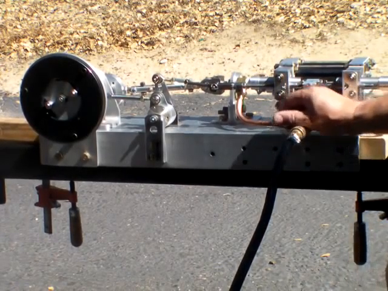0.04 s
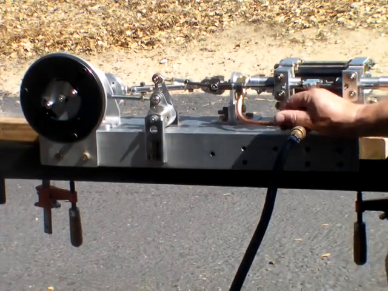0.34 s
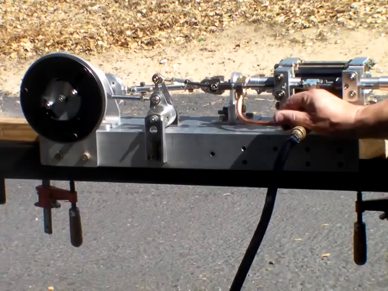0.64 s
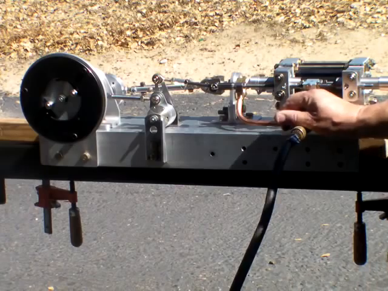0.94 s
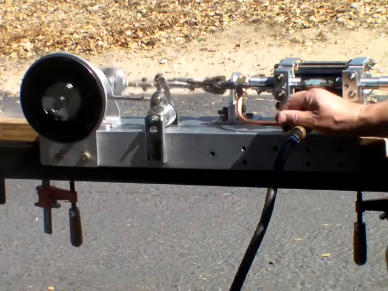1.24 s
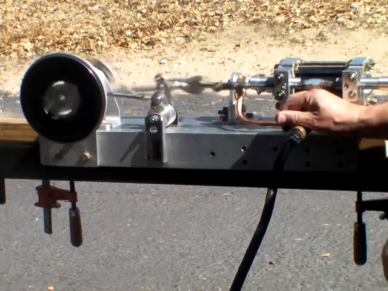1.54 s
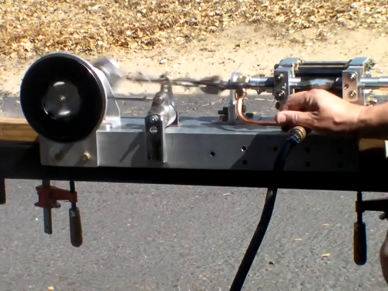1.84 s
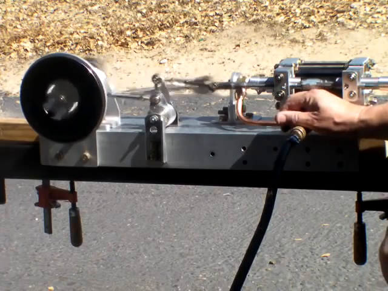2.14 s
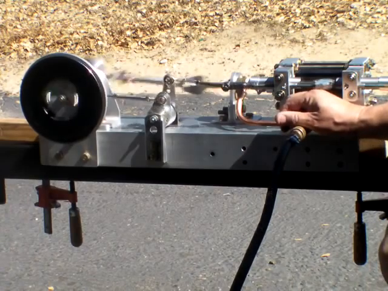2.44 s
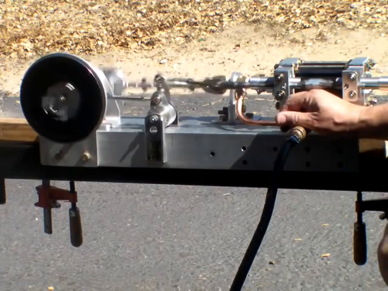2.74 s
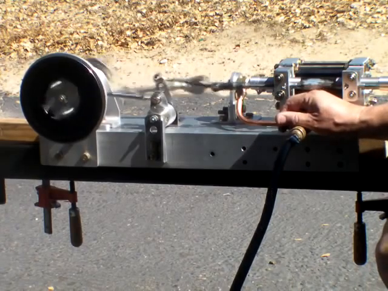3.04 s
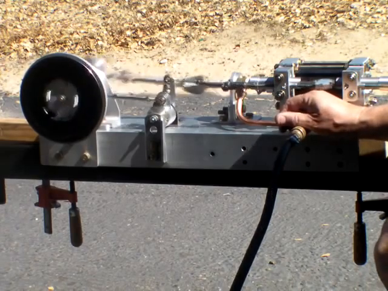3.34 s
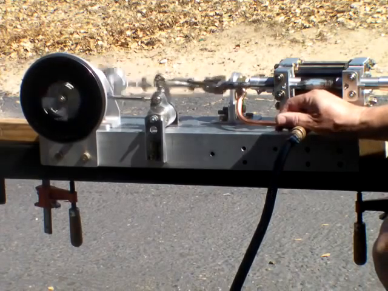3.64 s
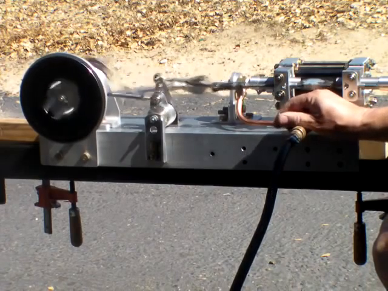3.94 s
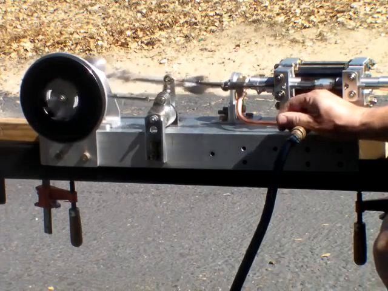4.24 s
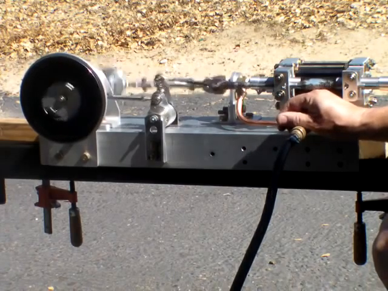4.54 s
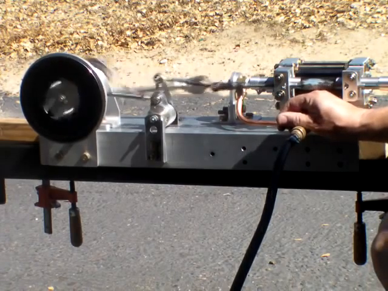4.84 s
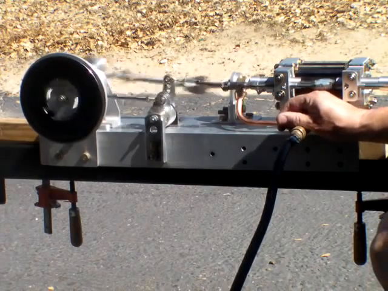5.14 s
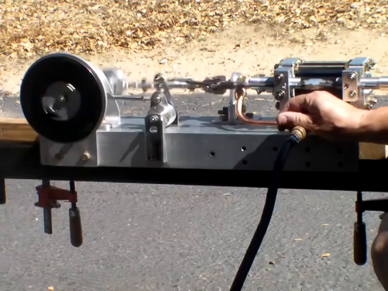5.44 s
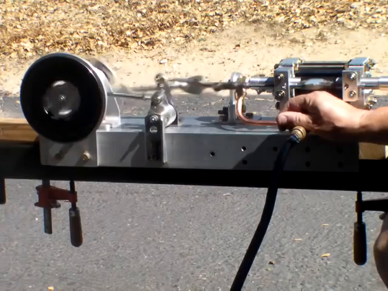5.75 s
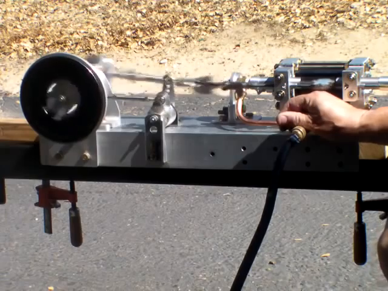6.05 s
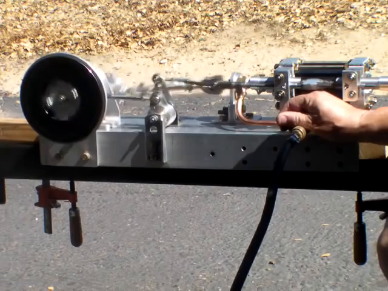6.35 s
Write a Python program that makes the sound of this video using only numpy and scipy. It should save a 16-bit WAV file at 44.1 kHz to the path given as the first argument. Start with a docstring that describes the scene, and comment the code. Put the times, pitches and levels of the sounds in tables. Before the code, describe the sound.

For the first second it is quiet outdoors: only a faint, thin leak from a shut valve, soft open air and a barely audible electric hum far off. At about 1 second the valve opens with a short, singing hiss, and at about 1.2 seconds a small steam engine kicks over close to the microphone. After one softer, slower turn it races briefly, then eases slightly, settling by about 2.5 seconds at nearly eight turns a second. Each turn brings the same loud round of knocks: the loose metal linkage chatters and clinks, the engine bed clanks, and the metal trailer underneath adds a hollow boom. Sharp, hissing exhaust puffs and a faint breathy whistle pulse in time with the clatter over a steady rush from the supply. The engine keeps this fast, even rhythm until the end, at about 6.5 seconds.

```python
"""Small steam engine on a trailer

Outdoors, close up, in stereo. A home-built engine clamped to a metal trailer waits with a faint leak.
Its valve is opened: it hisses, kicks over, races briefly and settles at nearly eight turns a second.
Every turn brings the same round of knocks: the loose linkage chatters, the trailer booms, and each end
of the cylinder puffs out its exhaust. Behind it lie quiet open air and a far electric hum."""
import sys
import numpy as np
from scipy import signal
from scipy.fft import rfft, irfft, next_fast_len
from scipy.io import wavfile
from scipy.ndimage import uniform_filter1d

SR = 44100
rng = np.random.default_rng(int(sys.argv[2]) if len(sys.argv) > 2 else 0)


def persist_wave(psi):
    """Save psi, clipped to +-1, as 16-bit WAV."""
    counts = np.round(np.clip(psi, -1, 1) * 32767).astype(np.int16)
    wavfile.write(sys.argv[1], SR, np.atleast_2d(counts).T)


N = 286650

# crank speed from the first kick on: t/s, speed/(turns a second)
CRANK_SPEED = [(1.154, 5.6), (1.29, 5.4), (1.354, 8.34), (1.6, 8.33), (1.95, 8.04), (2.5, 7.86),
               (3.35, 7.71), (3.8, 7.815), (4.5, 7.76), (5.3, 7.805), (5.75, 7.88), (6.5, 7.89)]
# one round of knocks: start/turns, half length/turns, then level/dB in trailer, engine bed and rods
KNOCKS = [(.015, .075, -2.5, -7, -2), (.11, .05, -7.5, -6.5, 1), (.15, .05, -5, -6, -6),
          (.2, .05, -1.5, -7, -1.5), (.265, .05, -4, -7, -4.5), (.33, .05, 0.5, -8, -9.5),
          (.39, .04, 1.5, -10.5, -16), (.48, .03, 0, -17.5, -21), (.53, .04, 0, -15.5, -8),
          (.58, .04, 1.5, -12, -8), (.65, .06, -3, -10.5, -10.5), (.73, .06, -3, -13, -11.5),
          (.82, .08, -3.5, -11.5, -13), (.92, .08, -1, -20, -24)]
# resonances of the struck parts: f/Hz, width/Hz, level/dB against the part's broad colour
TRAILER_MODES = [(133, 11, 9), (181.4, 13.6, 13), (225.7, 10, 9.5), (335.3, 8.95, 5.5), (371, 37, 5),
                 (435, 14, 1), (454, 17, 2), (680, 25, 7.5), (865, 25, 12.5)]
BED_MODES = [(1209, 44, 11.3), (1320, 21.2, 7.7), (1698, 16, 6.8), (1888, 28, 9), (2083, 37, 9.1),
             (2182, 38, 7.2), (2356, 36, 6.6), (2786, 23, 7.6), (3360, 65, 7.6), (3560, 27, 2.5)]
ROD_MODES = [(3760, 28, 10), (4080, 66, 4.4), (4520, 140, 5), (4673, 100, 8.9), (4670, 70, 5.8),
             (5430, 97, 8), (5550, 54, 9.6), (5660, 29, 4.1)]
# broad colours of the same parts: f/Hz, level/dB
TRAILER_COLOUR = [(22, -56), (48, -24), (90, -6.5), (140, -6.5), (280, -6.5), (360, 1), (600, 4), (800, -9),
                  (1100, -1.5), (2000, -26), (6000, -78)]
BED_COLOUR = [(200, -53), (700, -14.5), (1050, -1), (1500, -5.5), (2400, -1.5), (3300, -0.5), (4500, -2),
              (8000, -8), (16000, -35)]
ROD_COLOUR = [(600, -14.5), (2200, -38), (3400, -7), (4400, 0), (5900, -0.5), (6900, -11), (8000, -13.5),
              (10200, -5), (12500, -10), (16000, -13)]
# trailer boom and crosshead clink as the piston turns back: f/Hz, width/Hz, level/dB
BOOM_MODES = [(96, 57, -2), (137.3, 16.6, 2), (191.5, 31, -5), (227, 28, -9)]
CLINK_MODES = [(4250, 120, 1), (4700, 130, 3)]
# engine bed clank and trailer thud on the power stroke: f/Hz, width/Hz, level/dB
CLANK_MODES = [(1207, 36, -1), (1330, 50, -9)]
THUD_MODES = [(347, 32, 0), (696, 40, -1)]
# exhaust puffs at each end of the cylinder: angle/turns, half width/turns, level/dB
FRONT_PUFFS = [(.12, 0.05, -23), (.22, .11, -29), (.338, 0.03, -16.5), (.38, 0.056, -32)]
REAR_PUFFS = [(.83, 0.038, -18)]
# colours of the two exhausts and the supply's rush: f/Hz, level/dB
FRONT_COLOUR = [(300, -31), (1500, -1), (3500, -3), (6000, 1), (7200, -2), (8800, 2.5), (10800, 3),
                (13000, -2), (16000, -5)]
REAR_COLOUR = [(300, -35), (2000, -23), (3300, 0), (4500, -1.5), (7500, -6), (8800, 1), (10200, 2),
               (12200, 5.5), (14000, 0), (16000, -0.5)]
FLOW_COLOUR = [(60, -18), (500, -5.5), (2000, 1.5), (3500, 1.5), (4300, -1), (5500, 1.5), (7200, -5),
               (11500, -4), (16000, -4.5)]
# air whistling through the slide valve: angle/turns, f/Hz, level/dB
INLET_GLIDE = [(.58, 4440, -48), (.66, 4930, -36), (.75, 5390, -26), (.81, 5656, -30.5), (.87, 6700, -39),
               (.93, 7180, -53)]
SQUEEZE_GLIDE = [(.47, 7800, -48), (.53, 8080, -35), (.59, 9700, -28.5), (.66, 10300, -52)]
# leak at the shut supply valve: t/s, level/dB
LEAK_LEVEL = [(0, -73), (.13, -70), (.33, -82), (.75, -84), (.95, -73)]
# tones of that valve, leaking and opening: f/Hz, width/Hz, level/dB
LEAK_TONES = [(2430, 200, -0.5), (5100, 380, -1)]
VALVE_TONES = [(1970, 150, 0), (3490, 130, 2), (3770, 90, 0), (5512, 150, -9)]
# pitches that cancel against their reflection from the metal: f/Hz, width/Hz, gain/dB
NOTCHES = [(1275, 24, -4), (3970, 160, -3), (4810, 140, -3), (6770, 110, -11), (7400, 280, -3.5),
           (9700, 200, -6)]
# colour of the open air: f/Hz, level/dB
AIR_COLOUR = [(20, -23), (40, -13), (58, 5), (90, -6), (160, -0.5), (260, -14), (410, -5), (560, -11.5),
              (1070, -16), (1800, -22.5), (2450, -16.5), (3100, -23.5), (6000, -25.5), (16000, -29)]
# stereo width of the engine and of the open air: f/Hz, side gain/dB
ENGINE_WIDTH = [(60, -14), (150, -32), (500, -19), (1100, -21), (2200, -14), (4500, -11.5), (8000, -8.5),
                (13000, -5)]
AIR_WIDTH = [(100, -13), (400, -6), (1500, -4), (5000, 1)]
# the engine's balance at the microphone: f/Hz, left minus right/dB
BALANCE = [(1200, 0), (2400, 0.4), (4400, -1), (8000, 0.2), (14000, -2)]

SHAKE_SPREAD_DB, CLATTER_SPREAD_DB, PUFF_SPREAD_DB = 0.08, 0.12, 0.6  # chance, from turn to turn
SURGE_PUFF_DB, SURGE_WHISTLE_DB, SURGE_TURNS = 1, 5, 1.5  # the air blows harder over the first turns
OPEN_S, OPENING_S = 1.043, 0.076  # when the valve cracks open, and how long it takes
CRACKED_DB, RUNNING_DB = -38, -26  # rush of the flow before and after the crank moves
SING_DB, SING_HOLD_S, SING_RELEASE_S = -41, 0.119, 0.048  # the valve sings until the flow settles
LEAK_HISS_DB = 5.5  # broad hiss over the leak's tones


def clatter(t, turns, first_shake_db=-3.5, first_clatter_db=-2.5):
    """Knocks shake the heavy trailer, engine bed and light rods, more softly on the slow first turn."""
    def clock(due):  # turns to seconds
        return np.interp(due + lag(due, scale=.055, fade=4.5), turns, t, right=t[-1] + 1)
    turn = np.arange(int(turns[-1]) + 1)
    shake_db = first_shake_db * (turn == 0) + SHAKE_SPREAD_DB * rng.standard_normal(len(turn))
    clatter_db = first_clatter_db * (turn == 0) + CLATTER_SPREAD_DB * rng.standard_normal(len(turn))
    _, _, trailer_db, bed_db, rod_db = np.transpose(KNOCKS)
    trailer_blows = chatter(clock, trailer_db, shake_db, slop_s=.00016, scatter_db=0.5, drift_turns=7)
    bed_blows = chatter(clock, bed_db, clatter_db, slop_s=.00007, scatter_db=2.0)
    rod_blows = chatter(clock, rod_db, clatter_db, slop_s=.00005, scatter_db=0.7)
    trailer = amp(-34.5) * metal_part(trailer_blows, TRAILER_COLOUR, TRAILER_MODES)
    bed = amp(-26) * metal_part(bed_blows, BED_COLOUR, BED_MODES)
    rods = amp(-24.5) * metal_part(rod_blows, ROD_COLOUR, ROD_MODES)
    boom = reversal(clock, BOOM_MODES, shake_db, angle=.495, slop_s=.00033)
    clink_db = clatter_db - 8 * np.exp(-turn / SURGE_TURNS)
    clink = reversal(clock, CLINK_MODES, clink_db, angle=.58, slop_s=.0007)
    clank = reversal(clock, CLANK_MODES, clatter_db, angle=.17, slop_s=.0005)
    clank += amp(-1) * reversal(clock, CLANK_MODES, clatter_db, angle=.11, slop_s=.00052)
    thud = reversal(clock, THUD_MODES, shake_db, angle=.21, slop_s=.0005)
    clean_blows = amp(-53) * boom + amp(-40.5) * (clink + clank) + amp(-45) * thud
    return trailer + bed + rods + np.outer([1, 0], clean_blows)  # clean blows sit dead centre


def chatter(clock, knock_db, turn_db, slop_s, scatter_db, contacts=40, drift_turns=14):
    """Each knock is a burst of small contacts that comes back every turn, each a little early or late."""
    turn = np.arange(len(turn_db))
    blows = np.zeros((2, N))
    for channel in blows:
        for (start, half_length, *_), db in zip(KNOCKS, knock_db):
            delay = (np.arange(contacts) + rng.random(contacts)) / contacts
            force = rng.standard_normal((len(turn), contacts))
            # the way the parts meet drifts slowly from turn to turn
            force = uniform_filter1d(force, drift_turns, axis=0, mode="wrap")
            force *= np.sin(np.pi * delay ** 0.64) ** .5
            force *= amp(scatter_db * rng.standard_normal(force.shape))
            force *= amp(db + turn_db)[:, None] / np.linalg.norm(force, axis=1, keepdims=True)
            when = clock(turn[:, None] + start + 2 * half_length * delay)
            when += slop_s * rng.standard_normal(force.shape)
            channel += np.bincount((when * SR).astype(int).ravel(), force.ravel(), N)[:N]
    return blows


def metal_part(blows, colour, modes, size=16384):
    """Struck metal: its resonances ring on after each blow."""
    hz = np.fft.rfftfreq(size, 1 / SR)
    response = amp(along(colour, hz)) * np.sqrt(1 + peaks(modes, hz))
    cepstrum = irfft(np.log(response))
    # folding the cepstrum puts all of the ring after the blow
    cepstrum[1:size // 2] *= 2
    cepstrum[size // 2 + 1:] = 0
    ring = irfft(np.exp(rfft(cepstrum)))
    return unit(signal.oaconvolve(blows, ring[None], axes=1)[:, :N])


def reversal(clock, modes, turn_db, angle, slop_s):
    """Once a turn the load on a joint reverses and takes up its slack in one clean blow."""
    when = clock(np.arange(len(turn_db)) + angle) + slop_s * rng.standard_normal(len(turn_db))
    blows = np.bincount((when * SR).astype(int), amp(turn_db), N)[:N]
    t = np.arange(SR // 3) / SR
    ring = sum(amp(db) * np.exp(-np.pi * width * t) * (1 - np.exp(-hz * t)) * np.sin(2 * np.pi * hz * t)
               for hz, width, db in modes)
    return unit(signal.fftconvolve(blows, ring)[:N])


def crank(t):
    """Turns that the crank has made by each time."""
    speed, = curves(CRANK_SPEED, t)
    return np.cumsum(speed * (t > CRANK_SPEED[0][0])) / SR


def lag(turns, scale, fade):
    """The loose parts trail the crank while the engine races off; all in turns."""
    return scale * np.tanh(turns) * np.exp(-turns / fade)


def exhaust(angle):
    """Each end of the cylinder blows off once a turn."""
    def puffs(port):
        power = sum(amp(db) ** 2 * np.exp(-((angle - at) / width) ** 2) for at, width, db in port)
        return np.sqrt(power)
    return puffs(FRONT_PUFFS) * noise(FRONT_COLOUR) + puffs(REAR_PUFFS) * noise(REAR_COLOUR)


def whistle(glide, angle, width_hz):
    """A breathy tone whose pitch climbs as the valve slides."""
    pitch, db = curves(glide, angle)
    flutter = shaped_noise(lambda hz: 1 / (1 + (hz / width_hz) ** 2))
    return amp(db) * unit(flutter * np.sin(2 * np.pi * np.cumsum(pitch) / SR))


def supply(t, pressure):
    """A faint leak, then the opening valve sings and the flow settles to a rush."""
    leak_db, = curves(LEAK_LEVEL, t)
    opening = np.clip((t - OPEN_S) / OPENING_S, 0, 1)
    flow = amp(leak_db + LEAK_HISS_DB) + opening ** 2 * amp(CRACKED_DB)
    flow += pressure * (amp(RUNNING_DB) - amp(CRACKED_DB))
    rush = flow * noise(FLOW_COLOUR)
    release = np.exp(-np.maximum(t - OPEN_S - SING_HOLD_S, 0) / SING_RELEASE_S)
    song = amp(SING_DB) * opening * release * shaped_noise(lambda hz: peaks(VALVE_TONES, hz))
    leak = amp(leak_db) * shaped_noise(lambda hz: peaks(LEAK_TONES, hz))
    return rush + song + leak


def path_to_microphone(hz):
    """Mid and side gains: reflection from the metal cuts notches, and the engine's image is narrow."""
    notch_db = sum(db / (1 + (2 * (hz - centre) / width) ** 2) for centre, width, db in NOTCHES)
    return amp(notch_db + np.outer([0, 1], along(ENGINE_WIDTH, hz)))


def reflections(wet_db, t60_s, low_hz, delay_s):
    """Dense echoes above low_hz from nearby surfaces, different on each side of the microphone."""
    t = np.arange(SR // 3) / SR
    echoes = rng.standard_normal((2, len(t))) * amp(-60 * t / t60_s) * (t > delay_s)
    echoes *= amp(wet_db) / np.linalg.norm(echoes, axis=1, keepdims=True)
    return signal.sosfilt(signal.butter(1, low_hz, "high", fs=SR, output="sos"), echoes)


def outdoors(t, hum_hz=120):
    """Quiet open air all around the microphone, with an electric hum far off."""
    hum = amp(-67.5) * unit(np.sin(2 * np.pi * hum_hz * t))
    mid, side = amp(-60.5) * noise(AIR_COLOUR)
    side = filtered(side, lambda hz: amp(along(AIR_WIDTH, hz)))
    return np.array([mid + side, mid - side]) + hum


def amp(db):
    """Decibels to gain."""
    return 10 ** (np.asarray(db) / 20)


def unit(x):
    """Scaled to rms 1."""
    return x / np.sqrt(np.mean(x ** 2) + 1e-20)


def along(points, hz):
    """Rows of f/Hz, value, read on a log frequency axis."""
    f, v = np.transpose(points)
    return np.interp(np.log(hz + 1), np.log(f), v)


def curves(rows, at):
    """Each later column of a table, read along its first."""
    first, *cols = np.transpose(rows)
    return [np.interp(at, first, c) for c in cols]


def filtered(x, response):
    """x through a gain that depends on frequency."""
    size = 2 * next_fast_len(N // 2 + SR // 4)
    return irfft(rfft(x, size) * response(np.fft.rfftfreq(size, 1 / SR)), size)[..., :N]


def peaks(modes, hz):
    """Power of a set of resonances."""
    return sum(amp(db) ** 2 / (1 + (2 * (hz - centre) / width) ** 2) for centre, width, db in modes)


def shaped_noise(response):
    """Mid and side noise through a response, at rms 1."""
    return unit(filtered(rng.standard_normal((2, N)), response))


def noise(colour):
    """Mid and side noise that follows a colour table."""
    return shaped_noise(lambda hz: amp(along(colour, hz)))


def scene():
    """The engine close in front, its reflections around it and the open air behind."""
    t = np.arange(N) / SR
    turns = crank(t)
    angle = (turns - lag(turns, scale=.036, fade=9)) % 1  # of the slide valve
    puff_db = PUFF_SPREAD_DB * rng.standard_normal(int(turns[-1]) + 1)
    surge = np.exp(-turns / SURGE_TURNS)
    air = amp(puff_db[turns.astype(int)] + SURGE_PUFF_DB * surge) * exhaust(angle)
    air += amp(SURGE_WHISTLE_DB * surge) * whistle(INLET_GLIDE, angle, width_hz=240)
    air += whistle(SQUEEZE_GLIDE, angle, width_hz=700)
    pressure = (turns > 0) * np.clip(0.39 + turns / 0.46, 0, 1)  # the cylinder fills on the first stroke
    engine = pressure * (clatter(t, turns) + air) + supply(t, pressure)
    mid, side = filtered(engine, path_to_microphone)
    pair = np.array([mid + side, mid - side])
    deck = reflections(wet_db=-9.5, t60_s=0.094, low_hz=4000, delay_s=.00068)  # the trailer's metal
    yard = reflections(wet_db=-12.5, t60_s=0.1, low_hz=300, delay_s=.012)  # ground and surroundings
    pair += signal.fftconvolve(pair, deck + yard, axes=1)[:, :N]
    pair = filtered(pair, lambda hz: amp(np.outer([.5, -.5], along(BALANCE, hz))))
    return pair + outdoors(t)


def record(dry, low_cut_hz=36, top_hz=15900):
    """The microphone thins out the deepest bass and keeps nothing above its band limit."""
    low_cut = lambda hz: hz ** 3 / np.hypot(hz ** 3, low_cut_hz ** 3)
    band_limit = lambda hz: .5 - .5 * np.tanh((hz - top_hz) / 50)
    return filtered(dry, lambda hz: low_cut(hz) * band_limit(hz))


dry = scene()
out = record(dry)
persist_wave(out)
```